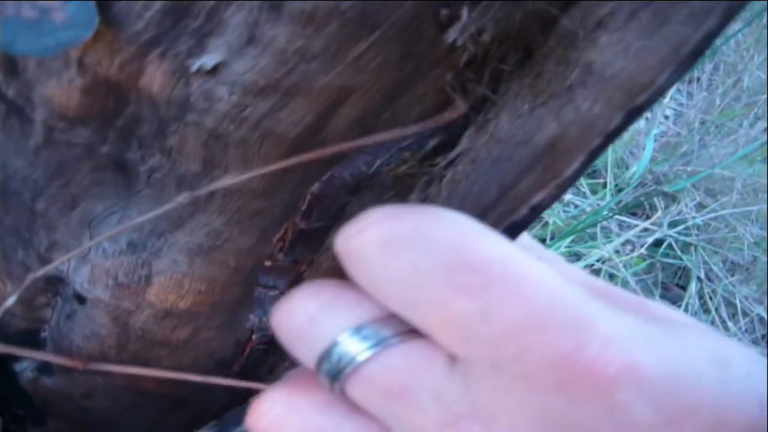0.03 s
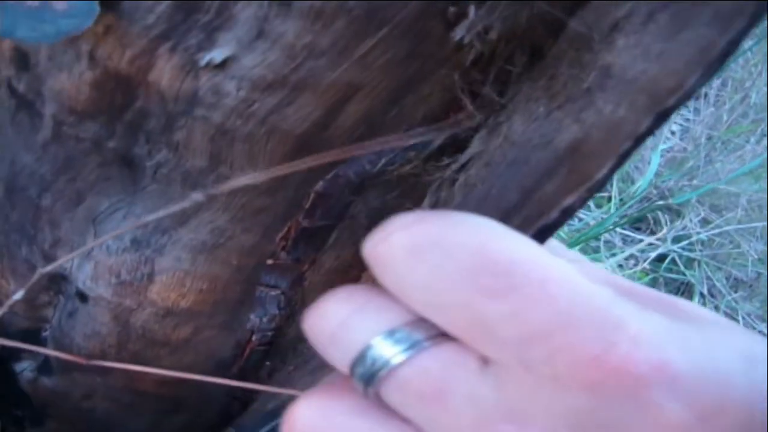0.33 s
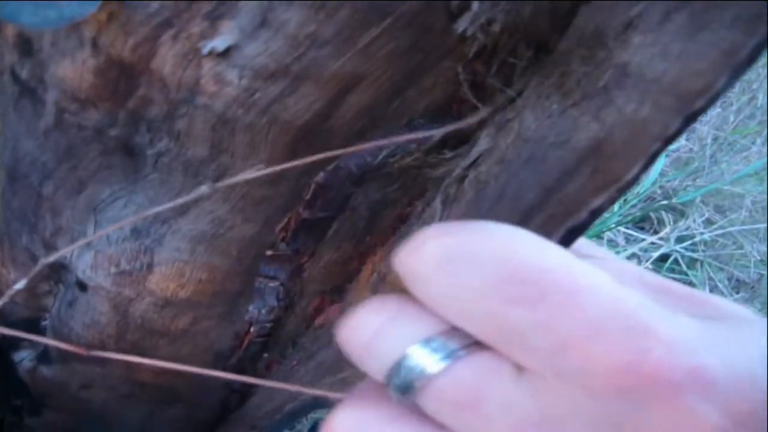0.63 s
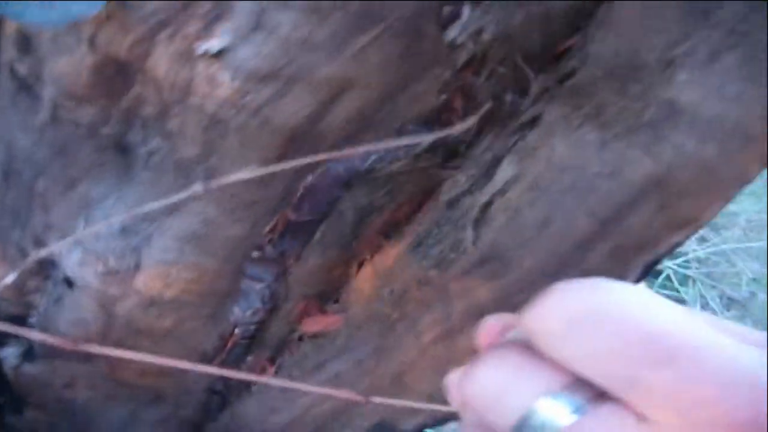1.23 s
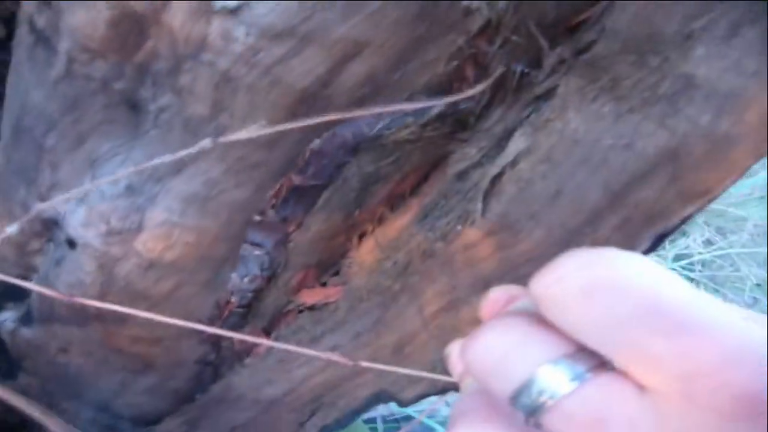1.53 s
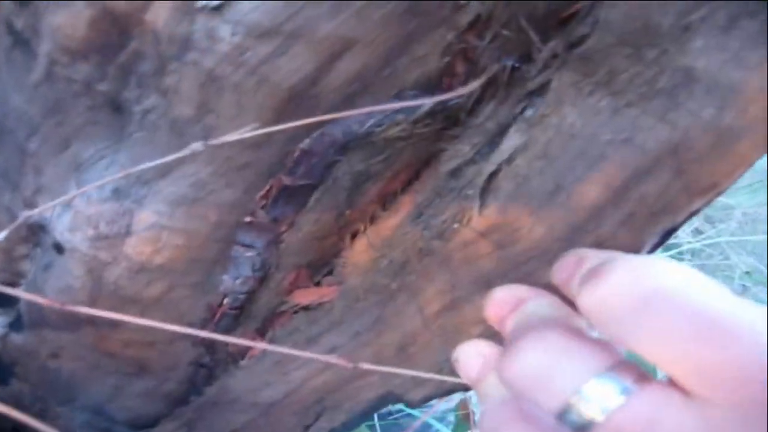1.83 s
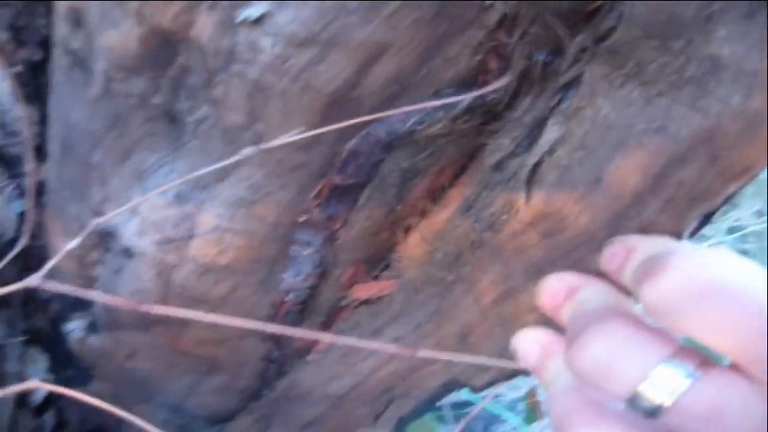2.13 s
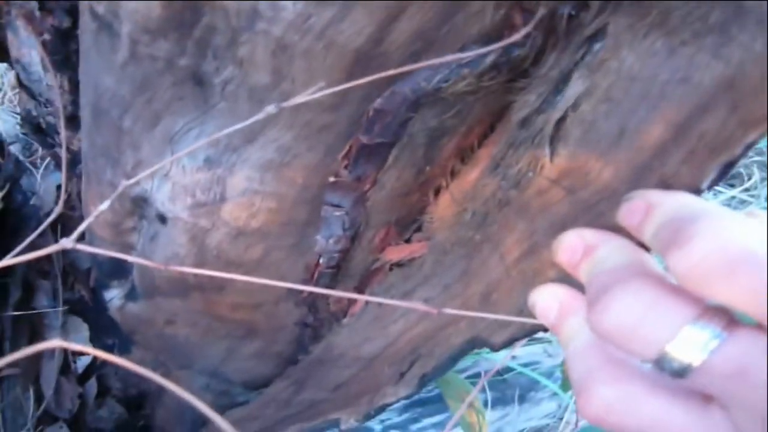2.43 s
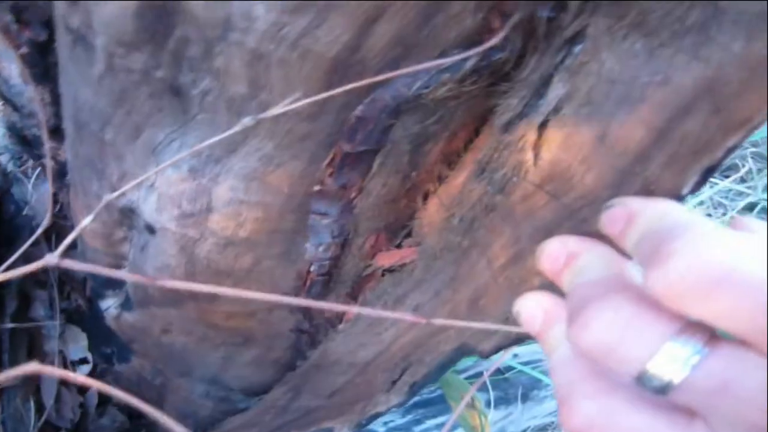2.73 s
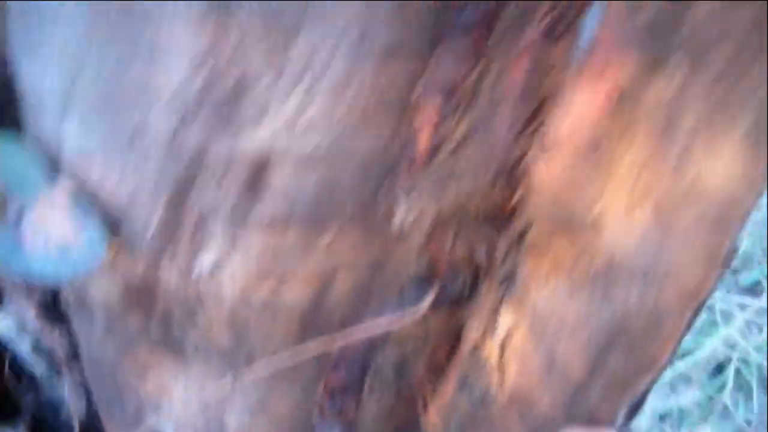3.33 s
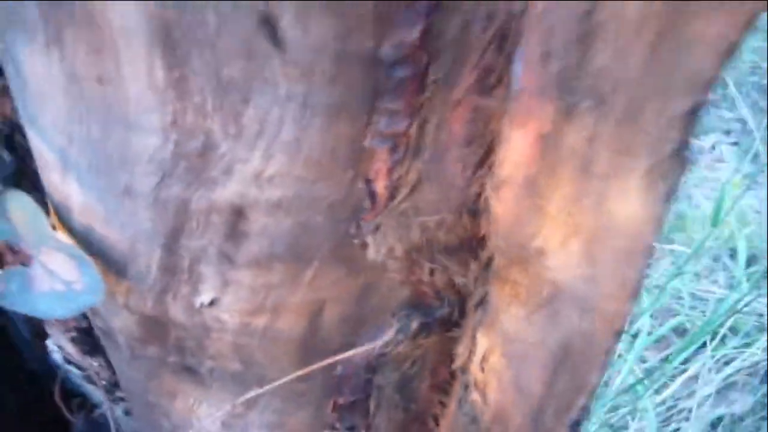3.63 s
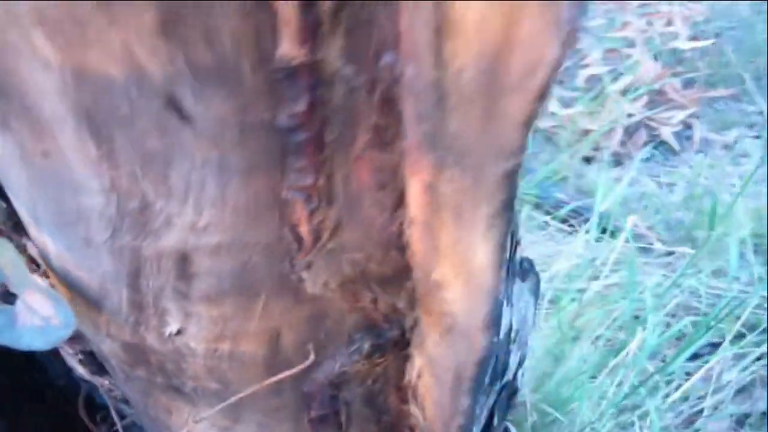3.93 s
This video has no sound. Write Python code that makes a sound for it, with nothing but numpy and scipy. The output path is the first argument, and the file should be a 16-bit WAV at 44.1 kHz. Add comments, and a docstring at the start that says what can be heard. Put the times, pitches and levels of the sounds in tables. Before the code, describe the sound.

Dry bark cracks and crackles close to the microphone as fingers pick at a tree trunk, busiest in the first second. A strip rips away at about 1.2 seconds. A few more snaps follow around 2 seconds, then only sparse, faint ticks. A distant engine revs low from about 1.3 seconds over soft outdoor hiss and rumble. Near 3.8 seconds the hand bumps the microphone with dull thuds.

```python
"""Dry, peeling bark fractures as a hand picks at a trunk, close to the microphone, outdoors.
Flakes crack off as sharp impulses, loose plates knock and ring, fibres crackle under the fingers,
and one strip rips away in a dense run of fractures. A far engine revs, heard as low orders of its
firing rate, over a soft hiss and rumble. Late on, the hand bumps the camera, which whines faintly."""
import sys
import numpy as np
from scipy import signal
from scipy.fft import rfft, irfft, next_fast_len
from scipy.io import wavfile
from scipy.ndimage import map_coordinates

SR = 44100
rng = np.random.default_rng(int(sys.argv[2]) if len(sys.argv) > 2 else 0)


def log_audio(samples):
    """Write samples as a 16-bit WAV file to the path given in sys.argv[1]."""
    # one column per channel
    frames = np.atleast_2d(samples).T
    # limit to full scale, then quantise
    limited = np.clip(frames, -1, 1)
    pcm = np.round(limited * 32767).astype(np.int16)
    wavfile.write(sys.argv[1], SR, pcm)


N = 176400
TIME = np.arange(N) / SR

# Flakes breaking off. Each row: start in seconds, relative level in dB, bass and treble trims in dB.
CRACKS = [(0.014, -37, -4, 5.5), (.028, -31, -16, -5), (0.0364, -32.5, -12, -4), (.085, -38, -10, 0),
          (0.1011, -21, 0, -3), (0.1197, -31, -11, -2), (.1326, -19.5, -26, 0), (0.271, -40.5, -6, 3),
          (0.301, -44, -10, 6), (0.3134, -41, -8, 5.5), (0.4105, -33, -24, 6.5), (0.4141, -25.5, -5, -10),
          (0.444, -29.5, -13, -6), (.4682, -16.5, -6.5, -5.5), (0.5077, -31.5, -18, -20),
          (.5834, -36.5, -13, -4), (0.717, -25.5, 1, -6.5), (0.7264, -27, -2, -0.5), (0.7304, -29, -1, -2),
          (0.754, -39, -3, -2), (.7615, -36, -8, 1), (0.7737, -33, -13, -2), (0.7873, -26.5, -8, -1.5),
          (0.8002, -24.5, -4, 1.5), (.805, -34, -6, 0), (0.81, -34.5, 4, 2), (.8205, -36, -10, 0),
          (.836, -36, -8, 4.5), (0.8936, -27, -8, 2.5), (0.901, -27, -19, 0), (0.9038, -29, -10, 1),
          (0.9299, -16.5, -5, -7), (0.9709, -25.5, 2.5, -7), (0.978, -25.5, -1, 4), (.999, -36.5, -10, 2),
          (1.1869, -28.5, -2, 0.5), (1.1984, -21.5, -3, -11), (1.209, -33, -5, 2), (1.2164, -24, -14, -1),
          (1.2203, -27, -14, -1), (1.2279, -22, -1, -2), (1.2332, -21, -15, -1.5), (1.242, -33, -10, 6),
          (1.2491, -21.5, -9, -15), (1.2546, -27, -13, 5.5), (1.2602, -23, -6, -2), (1.266, -23, -3, 1),
          (1.2715, -23.5, -11, -2), (1.2759, -23, -6, -2), (1.284, -28, -2, -2), (1.304, -32.5, -12, -2),
          (1.3175, -36.5, -12, 3), (1.3215, -39, -13, 0), (1.3317, -34, -14, -3), (1.429, -38, -2, 1),
          (1.4712, -32, 5.5, -3.5), (1.5232, -40, -13, -6), (1.556, -38.5, -15, -1),
          (1.582, -38.5, -14, -4), (1.741, -41, -28, -0.5), (1.8139, -39, -3, -3), (1.818, -30.5, 0, -9),
          (1.9817, -30, -7, -9), (1.9992, -28.5, -10, -5), (2.034, -35, -14, -7), (2.0724, -25.5, -7, 3),
          (2.11, -43, -10, -1), (2.1425, -43.5, -9, 0), (2.2425, -26.5, -17, -8.5), (2.25, -32.5, -8, -9),
          (2.4766, -39.5, -9, -3), (2.6707, -33.5, -9.5, -5.5), (2.699, -39, -10, -4.5),
          (2.9847, -40.5, 3, -10.5), (3.027, -40.5, -7, -13), (3.375, -47, -8, -6), (3.618, -41.5, -8, -1),
          (3.709, -43, -6, 1), (3.856, -43, -2, 0)]
# Spectrum common to all cracks. Each row: frequency in Hz, gain in dB.
CRACK_COLOUR = [(150, 2.5), (400, -5), (900, -0.5), (1800, -2.5), (2400, -1.5), (3100, 1), (4000, -4.5),
                (5000, -4.5), (6500, -12.5), (10000, -17.5)]
# Damping of a crack's tail. Each row: frequency in Hz, time to fall 60 dB in seconds.
CRACK_T60 = [(200, 0.097), (700, 0.045), (2000, 0.016), (6000, 0.018)]

def cracks(splinters=3, splinter_within_s=.002, attack_s=.0004, smear=.66):
    """Brittle fracture: a sharp snap, a few splinters and a tail that is damped most in the treble."""
    out, t = np.zeros(N), TIME[:SR // 12]
    white = rng.standard_normal((len(CRACKS), 2, len(t)))
    tails = 0
    for k, (hz, sos) in enumerate(bands()):
        t60 = at_hz(CRACK_T60, hz)
        tails += signal.sosfilt(sos, white[:, k % 2]) * decay(t, t60) / np.sqrt(t60)
    tails *= 1 - np.exp(-t / attack_s)
    delays = (rng.random((len(CRACKS), splinters)) * splinter_within_s * SR).astype(int)
    signs = rng.choice([-1, 1], delays.shape)
    for (s, db, bass_db, treble_db), tail, delay, sign in zip(CRACKS, tails, delays, signs):
        burst = tail / np.linalg.norm(tail)
        burst[0] += from_db(-.5)  # the snap
        burst[delay] += sign * from_db(-7.5)  # the splinters
        burst = signal.lfilter([-smear, 1], [1, -smear], burst)  # all-pass: dispersion in the bark
        tone = [(500, bass_db + 2.5), (1100, 0), (2000, 0), (3800, treble_db - 3.5)]
        burst = coloured(burst, tone, CRACK_COLOUR)
        add(out, s, from_db(db + 32.5) * burst)
    return cut(out, hz=138, kind="high")


# Knocks on loose bark. Each row: start in seconds, pitch in Hz, level in dB, 60 dB decay in seconds.
PLATES = [(.101, 420, -16.5, 0.036), (.1325, 1810, -9, 0.0051), (0.4677, 610, -15.5, 0.038),
          (.468, 855, -15.5, 0.026), (0.7871, 410, -21, 0.033), (0.9315, 1920, -15, 0.028),
          (.973, 575, -19, 0.049), (1.4712, 747, -15, 0.021), (1.812, 1369, -21.5, 0.039),
          (2.0725, 1190, -9.5, 0.026), (2.073, 670.6, -18.5, 0.057), (2.2422, 446.5, -19.5, 0.052),
          (2.2424, 1560, -21.5, 0.024), (2.985, 1820, -29, 0.028), (3.026, 1800, -28.5, 0.033)]

def plates():
    """Free vibration: each loose plate of bark rings briefly at its natural frequency."""
    out = np.zeros(N)
    for s, hz, db, t60 in PLATES:
        add(out, s, from_db(db) * ring(hz, t60))
    return out


def fibres(per_s, spread_db, t60, colour):
    """Shot noise: tiny random fractures, each with its own size and colour, all sharing one short scatter per
    band; rms 1."""
    sizes = from_db(spread_db * np.minimum(rng.exponential(1, N), 4.5))
    signs = rng.choice([-1, 1], N)
    clicks = sizes * signs * (rng.random(N) < per_s / SR)
    out, t = np.zeros(N), TIME[:SR // 30]
    for hz, sos in bands()[5:]:  # from about 125 Hz up
        scatter = rng.standard_normal(len(t)) * decay(t, t60)
        scatter *= from_db(-6) / np.linalg.norm(scatter)
        scatter[0] += 1  # the direct click leads its scatter in the bark
        band_gains = from_db(3.5 * np.clip(rng.standard_normal(N), -2, 2))
        struck = signal.fftconvolve(clicks * band_gains, scatter)[:N]
        out += from_db(at_hz(colour, hz)) * np.sqrt(hz) * rms_one(signal.sosfilt(sos, struck))
    return rms_one(out)


# Fingers rubbing the bark. Each row: time in seconds, level in dB.
RUB = [(0, -38.5), (.14, -35), (.2, -48.5), (.38, -42.5), (.45, -33.5), (.51, -36.5), (.55, -53),
       (.64, -43.5), (.72, -33.5), (.86, -38.5), (.98, -29), (1.07, -52.5), (1.16, -40), (1.35, -42),
       (1.4, -49), (1.54, -38), (1.66, -60), (2.0, -42), (2.35, -52.5), (4, -44.5)]
# Spectrum of the crackle. Each row: frequency in Hz, relative spectral density in dB.
RUB_COLOUR = [(150, 3), (400, 0.5), (900, -2), (1800, 1.5), (3000, -3), (5000, -6.5), (6500, -17.5),
              (10000, -11)]

def rubbing():
    """Friction: the fingers break fibres in a sparse crackle."""
    return from_db(in_time(RUB)[0]) * fibres(per_s=650, spread_db=2.9, t60=.008, colour=RUB_COLOUR)


# A strip ripping away. Each row: time in seconds, level of the fractures in dB.
RIP = [(1.145, -42), (1.19, -32.5), (1.21, -30.5), (1.235, -27), (1.255, -22), (1.284, -25), (1.288, -32.5),
       (1.335, -34.5), (1.35, -69)]
# Spectrum of the fractures. Each row: frequency in Hz, relative spectral density in dB.
RIP_COLOUR = [(200, -6), (500, -11.5), (900, -4.5), (1350, -9), (1850, 2), (2400, -2), (3100, 1),
              (4000, -7), (5000, -7), (6500, -19), (10000, -16)]
# Narrow peaks that give the rip a ringing timbre.
# Each row: frequency in Hz, level in dB relative to the fractures where the rip is loudest.
RIP_TONES = [(1722, -7), (1861, -8), (1935, -7), (2665, -13), (2790, -15), (2985, -15), (3168, -14),
             (3440, -18)]

def rip():
    """Cascading fracture: a strip tears away, its ringing timbre strongest where it is loudest."""
    tearing = (TIME > RIP[0][0]) & (TIME < RIP[-1][0])
    level = tearing * from_db(in_time(RIP)[0])
    fractures = fibres(per_s=1100, spread_db=1.8, t60=.006, colour=RIP_COLOUR)
    tones = sum(from_db(db) * rms_one(resonance(fractures, hz, width_hz=25.2)) for hz, db in RIP_TONES)
    return level * (fractures + tones * level / level.max())


# The hand drawing back. Each row: time in seconds, level in dB.
RUSTLE = [(3.1, -73), (3.24, -47), (3.58, -52), (3.75, -85)]

def rustle(hz=1625, width_hz=200):
    """Narrow-band noise: a faint rustle as the hand draws back."""
    noise = rng.standard_normal(N)
    for _ in range(2):
        noise = resonance(noise, hz, width_hz)
    return from_db(in_time(RUSTLE)[0]) * rms_one(noise)


# The grip rubbing the camera body. Each row: time in seconds, level in dB.
GRIP = [(3.68, -75), (3.75, -36), (3.805, -33), (3.86, -72)]
# Soft bumps on the camera body. Each row: start in seconds, peak in dB before the low cut.
BUMPS = [(2.736, -23), (3.756, -21), (3.771, -7), (3.7808, -14), (3.7992, -10), (3.8065, -7.5)]

def bumps():
    """Structure-borne sound: the grip shifts on the camera with a dull rub and heavily damped thuds."""
    rub = cut(rng.standard_normal(N), hz=316, kind="low")
    out = from_db(in_time(GRIP)[0]) * rms_one(rub)
    thud = cut(ring(hz=184.7, t60=.014), hz=420, kind="low")
    for s, db in BUMPS:
        add(out, s, from_db(db) * thud / thud.max())
    return cut(out, hz=55, kind="high")


# A far engine revving. Each row: time in seconds, firing rate in Hz, level in dB.
ENGINE = [(0, 89.2, -46), (.65, 80, -45), (.95, 75.5, -60), (1.17, 78, -41), (1.33, 122.2, -30.5),
          (1.45, 126.2, -32.5), (1.56, 114.2, -38), (1.68, 110.5, -29), (1.99, 123.7, -32.5),
          (2.24, 110.5, -31), (2.7, 112.8, -27), (2.9, 107.5, -30), (3.08, 93.8, -41), (3.3, 76.3, -38.5),
          (3.48, 98.1, -35.5), (3.7, 98.8, -35.5), (3.84, 113, -24), (4, 115.8, -31.5)]
# Its orders. Each row: multiple of the firing rate, relative level in dB.
ENGINE_ORDERS = [(2 / 3, -19.5), (1, 0), (2, -20.5)]

def engine(waver=.012, flutter_db=.25):
    """Periodic firing: only the lowest orders carry this far, and they waver on the way."""
    firing_hz, db = in_time(ENGINE)
    heard_hz = firing_hz * (1 + waver * drift(per_s=24.14))
    phase = 2 * np.pi * np.cumsum(heard_hz) / SR
    out = np.zeros(N)
    for order, order_db in ENGINE_ORDERS:
        level = from_db(db + order_db - flutter_db * drift(per_s=18))
        out += np.sqrt(2) * level * np.sin(order * phase)
    return out


# Low outdoor rumble. Each row: time in seconds, level in dB.
RUMBLE = [(0, -43.5), (1.03, -49), (1.1, -34.5), (1.3, -39), (1.7, -41), (2.4, -42), (2.75, -34),
          (3.1, -38), (3.3, -31.5), (3.45, -35), (3.7, -35), (4, -34.5)]
# Outdoor hiss. Each row: time in seconds, level of its body in dB, level of its treble in dB.
HISS = [(0, -41.5, -45.5), (1.1, -43, -49.5), (1.8, -41, -46.5), (2.4, -38.5, -48.5), (2.75, -38.5, -48),
        (3.15, -40, -51.5), (3.35, -39.5, -45.5), (3.7, -39, -48.5), (4, -38.5, -45.5)]
# Spectra of the rumble, the hiss and its treble. Each row: frequency in Hz, relative density in dB.
RUMBLE_COLOUR = [(30, -19.5), (60, -6), (90, -0.5), (130, 4), (180, -3.5), (260, -18), (450, -13.5),
                 (1000, -96)]
HISS_COLOUR = [(250, 2), (500, -3), (750, 1), (1150, 2), (1450, -4), (2000, -16.5), (3000, -30),
               (5500, -37), (7500, -46)]
TREBLE_COLOUR = [(900, -24), (1650, 1), (2000, -4.5), (3000, -5.5), (4000, -12), (5000, -9), (6500, -10),
                 (10000, -49)]

def outdoors():
    """Ambient noise: a low rumble and a soft hiss whose treble comes and goes."""
    rumble = rms_one(coloured(rng.standard_normal(N), RUMBLE_COLOUR))
    hiss = coloured(rng.standard_normal(N), HISS_COLOUR)
    hiss = rms_one(cut(hiss, hz=226, kind="high"))
    treble = rms_one(coloured(rng.standard_normal(N), TREBLE_COLOUR))
    hiss_db, treble_db = in_time(HISS)
    return from_db(in_time(RUMBLE)[0]) * rumble + from_db(hiss_db) * hiss + from_db(treble_db) * treble


# Spectrum of the difference between the channels. Each row: frequency in Hz, relative gain in dB.
SIDE_COLOUR = [(100, -54), (300, -12), (1000, -1), (2000, -0.5), (4000, 2), (8000, -2.5)]

def stereo_side(x):
    """Decorrelation: faint scatter differs between the two microphone ports, mostly in the treble."""
    t = TIME[:SR // 60]
    scatter = rng.standard_normal(len(t)) * t * decay(t, t60=.012)
    scattered = signal.fftconvolve(x, scatter / np.linalg.norm(scatter))[:N]
    return from_db(-22.5) * coloured(scattered, SIDE_COLOUR)


def from_db(db):
    """Decibels to amplitude ratio."""
    return 10 ** (np.asarray(db) / 20)


def rms_one(x):
    """Normalisation to rms 1."""
    return x / np.sqrt(np.mean(x ** 2) + 1e-20)


def in_time(rows):
    """Linear interpolation of each column of a curve at every sample."""
    s, *columns = np.transpose(rows)
    return [np.interp(TIME, s, c) for c in columns]


def at_hz(points, hz):
    """Interpolation on a log-frequency axis."""
    f, value = np.transpose(points)
    return np.interp(np.log(hz + 1e-9), np.log(f), value)


def add(out, s, x):
    """Superposition of x from time s."""
    i = int(s * SR)
    out[i:i + len(x)] += x[:N - i]


def drift(per_s):
    """Smooth random modulation, rms 1."""
    knots = rng.standard_normal(1000)
    return rms_one(map_coordinates(knots, [TIME * per_s], order=3, mode="mirror"))


def bands():
    """Half-octave filter bank, as pairs of centre in Hz and filter."""
    edges = 22 * 2 ** np.arange(0, 9.6, .5)
    return [(np.sqrt(low * high), signal.butter(2, [low, high], "band", fs=SR, output="sos"))
            for low, high in zip(edges, edges[1:])]


def coloured(x, *colours):
    """Minimum-phase (causal) equaliser whose gain in dB is the sum of the given curves."""
    n = 2 * next_fast_len(len(x))
    hz = np.arange(n // 2 + 1) * SR / n
    gain = from_db(sum(at_hz(colour, hz) for colour in colours))
    cepstrum = irfft(np.log(gain))
    cepstrum[1:n // 2] *= 2
    cepstrum[n // 2 + 1:] = 0
    return irfft(rfft(x, n) * np.exp(rfft(cepstrum)))[:len(x)]


def cut(x, hz, kind):
    """Second-order high- or low-pass."""
    return signal.sosfilt(signal.butter(2, hz, kind, fs=SR, output="sos"), x)


def resonance(x, hz, width_hz):
    """Second-order resonator with unit gain at its peak."""
    return signal.lfilter(*signal.iirpeak(hz, hz / width_hz, fs=SR), x)


def decay(t, t60):
    """Exponential damping: 60 dB down after t60 seconds."""
    return from_db(-60 * t / t60)


def ring(hz, t60):
    """One damped mode."""
    t = TIME[:SR // 10]
    return np.sin(2 * np.pi * hz * t) * decay(t, t60)


def scene():
    """Superposition, nearly mono: a small level difference sets the bark a shade to the right."""
    bark = cracks() + plates() + rubbing() + rip() + rustle()
    air = outdoors()
    sides = np.array([[1], [-1]])  # left, right
    return bark * from_db(-.3 * sides) + air + stereo_side(bark + air) * sides + engine() + bumps()


def record(dry, dip_hz=8030, whine_hz=7997, cutoff_hz=10500, offset=-.073):
    """Band limiting: the camera has a treble dip, a thin whine, a steep cut-off and a constant offset."""
    dipped = dry
    for _ in range(2):
        dipped = signal.lfilter(*signal.iirnotch(dip_hz, Q=1.74, fs=SR), dipped)
    whine = np.sqrt(2) * from_db(-61.5) * np.sin(2 * np.pi * whine_hz * TIME)
    low_pass = signal.ellip(10, .3, 80, cutoff_hz, fs=SR, output="sos")
    return offset + signal.sosfilt(low_pass, dipped + whine)


dry = scene()
out = record(dry)
log_audio(out)
```